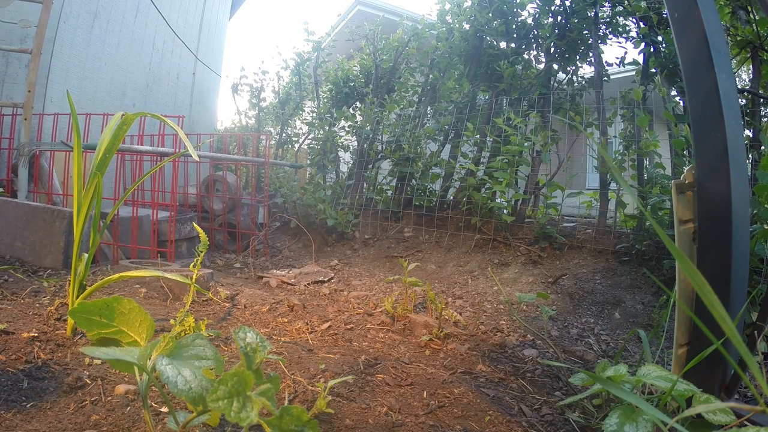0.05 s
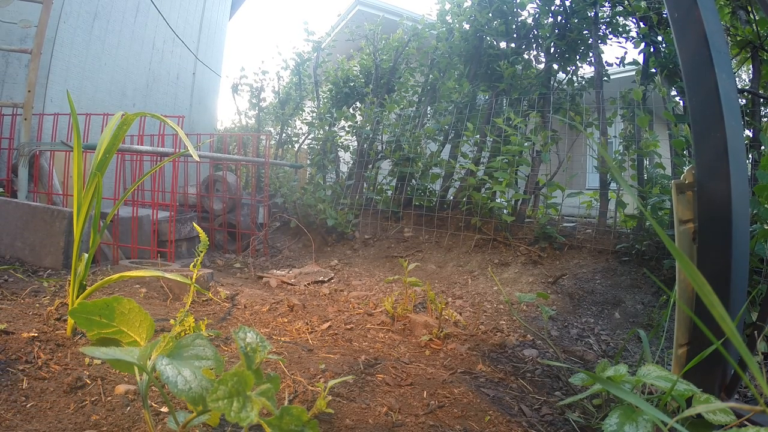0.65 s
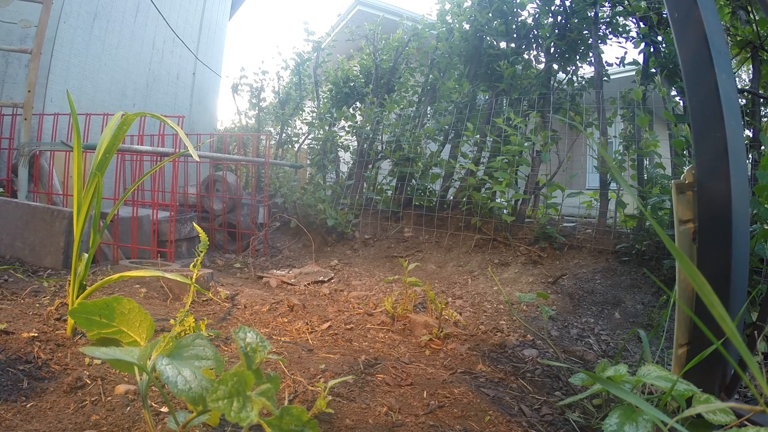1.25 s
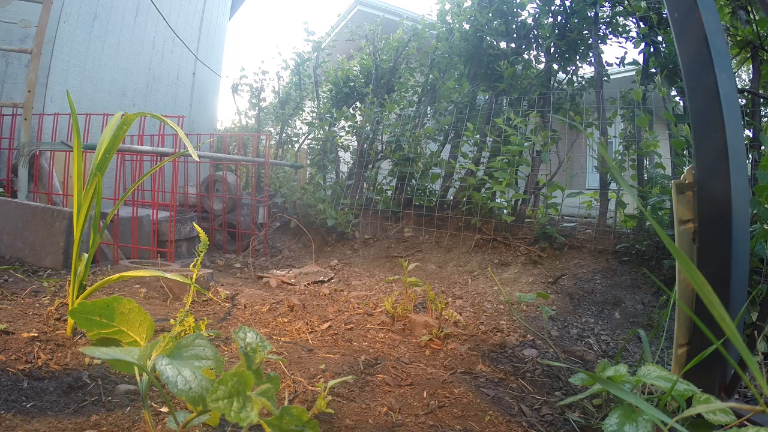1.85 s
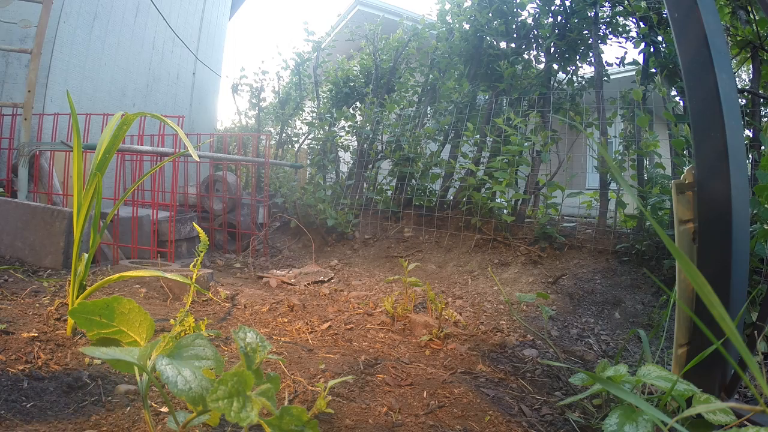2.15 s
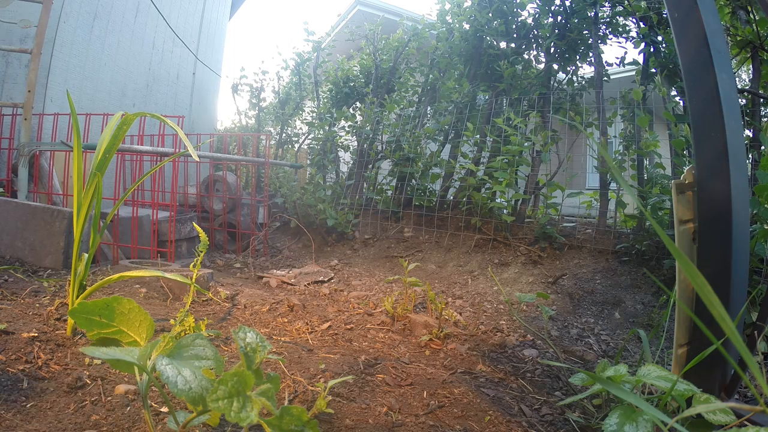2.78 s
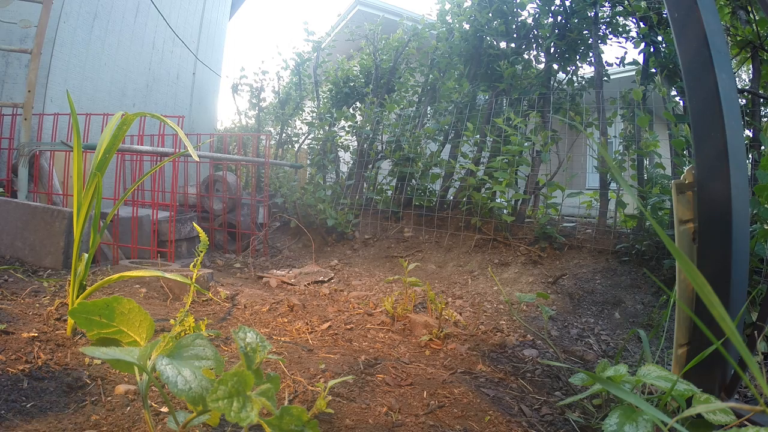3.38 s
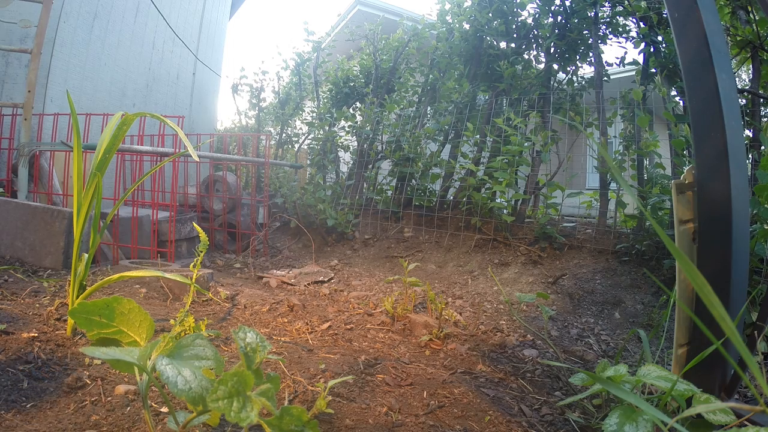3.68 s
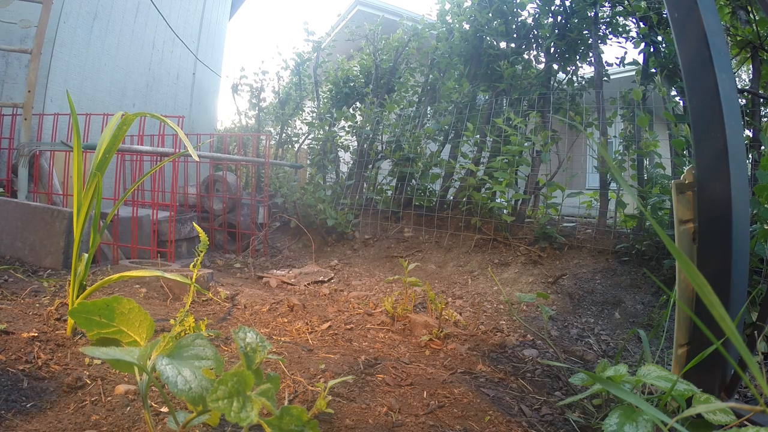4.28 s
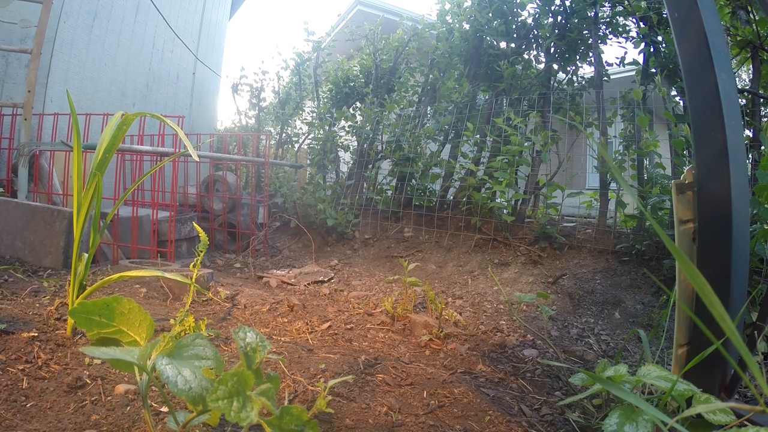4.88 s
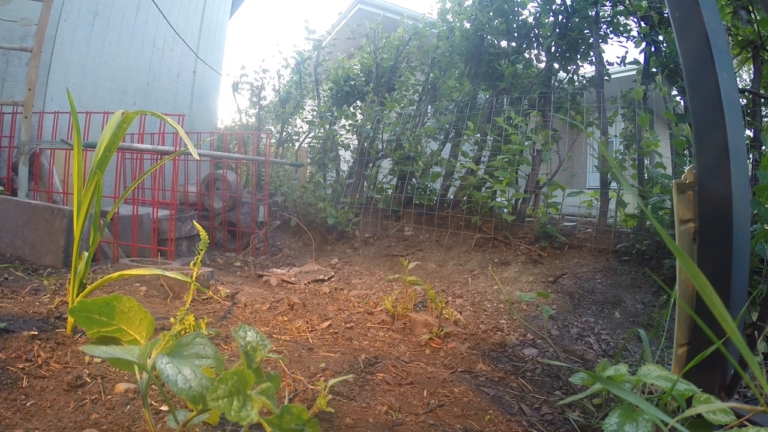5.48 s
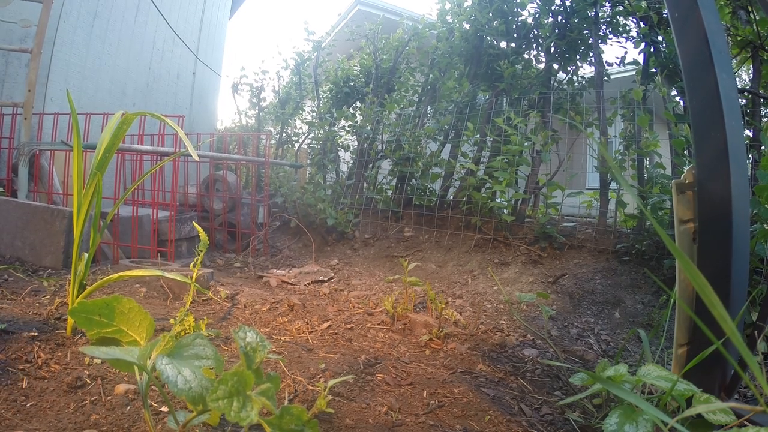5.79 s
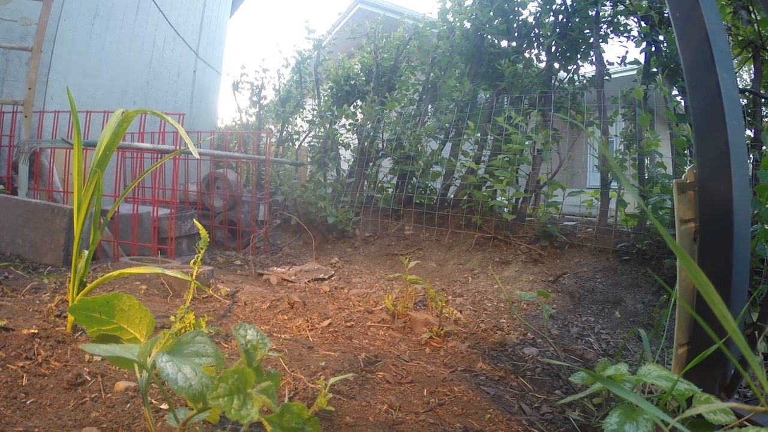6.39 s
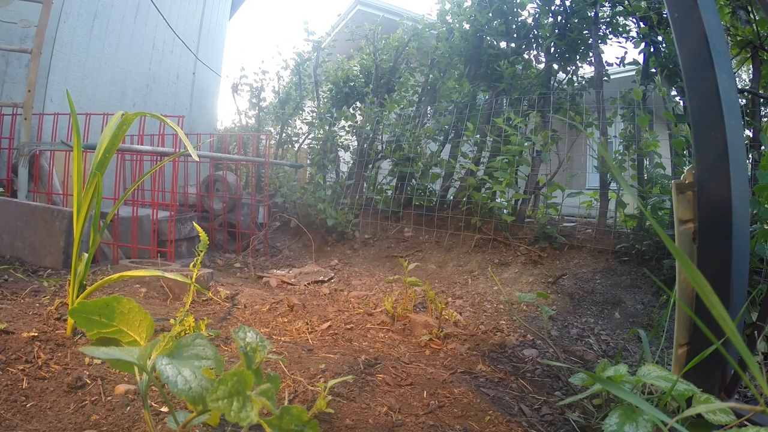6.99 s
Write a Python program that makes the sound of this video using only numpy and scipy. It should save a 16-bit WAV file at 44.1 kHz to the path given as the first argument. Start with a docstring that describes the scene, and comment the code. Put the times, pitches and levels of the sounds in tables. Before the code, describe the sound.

Small animals paw at a camera in garden mulch, heard very close through its own microphone, over a steady low town hush and a very faint high electronic whine. For the first 1.5 seconds fur brushes softly across the hollow case and a paw pads. Dry wood chips snap at about 1.5 seconds, with dull steps at 1.6 and 2.8. A bird gives thin, faint chips at 1.8 and 2.5 seconds. A flicked stem pings sharply at 3.1. Rubbing resumes at 3.6 seconds with a low, wobbling rumble and slight mulch crackle. From 4.5 seconds claws and noses knock the case, each blow ringing hollow and thumping the mount. The loudest knocks and scrapes come in a quick cluster from 5.3 to 5.7 seconds and again around 6.4 to 6.6. A last light stroke fades at 7 seconds.

```python
"""Small animals paw at a camera standing in garden mulch, over town hush and a faint electronic whine.
First, fur brushes the hollow case and a paw pads; wood chips snap at 1.5 s.
A bird chips at 1.8 and 2.5 s; a flicked stem pings at 3.1 s. Rubbing resumes at 3.6 s.
From 4.5 s, claws and noses knock the case: each blow rings it, thumps the mount and sets it swaying.
The hardest blows fall at 5.3-6.6 s; a last light stroke ends at 7 s."""
import sys
import numpy as np
from scipy import signal
from scipy.fft import rfft, irfft
from scipy.io import wavfile

SR = 44100
rng = np.random.default_rng(int(sys.argv[2]) if len(sys.argv) > 2 else 0)


def unload_wav(signal):
    """Save mono or channel-first audio to the path in sys.argv[1] as 16-bit WAV at rate SR, clipped to [-1, 1]."""
    wavfile.write(
        sys.argv[1],
        SR,
        np.round(np.clip(np.atleast_2d(signal).T, -1, 1) * 32767).astype(np.int16),
    )


N = 310442

# claw or nose blows: (time [s], case level [dB], brightness [dB], top [dB], pitch [Hz], mount level [dB])
BLOWS = [(4.54, -48, -16, -8, 1000, -42.5), (4.578, -46.5, -2, 6, 1190, -46),
         (4.797, -53.5, 0, 3, 1190, -47), (5.302, -28, 10, 19, 1050, -22.5),
         (5.452, -25.5, -4.5, 4.5, 840, -38), (5.483, -29.5, 4.5, 10, 900, -39),
         (5.513, -32.5, 6, -3, 840, -37), (5.533, -41.5, 6, 5, 2580, -47),
         (5.544, -37, 12.5, 9, 3980, -36.5), (5.656, -42, 6.5, 6, 820, -35), (6.4336, -23, 3, 1, 537, -24),
         (6.566, -28.5, 5.5, 8, 1730, -20.5), (6.58, -26, 5.5, 7, 1420, -39)]
# paw and fur strokes: (start [s], end [s], level [dB], brightness [dB])
STROKES = [(0.036, 0.124, -58, 2.5), (.17, .25, -63, 2), (0.439, .52, -65.5, 3), (0.729, 0.868, -58.5, 2),
           (0.901, 0.954, -55, 5.5), (1.201, 1.291, -59.5, -4), (1.31, 1.44, -59, 1),
           (3.598, 3.665, -57, 9.5), (3.847, 3.884, -54, 5), (3.98, 4.049, -48.5, 5),
           (4.032, 4.107, -43, 8), (4.153, 4.185, -58.5, 8), (4.571, 4.637, -60.5, -2),
           (4.691, 4.72, -59, 0), (4.787, 4.832, -53, 0.5), (4.959, 5.025, -56.5, 2),
           (5.319, 5.596, -37.5, 1), (5.354, 5.41, -36.5, -2.5), (5.573, 5.655, -49, 2.5),
           (5.729, 6.105, -64.5, 0), (6.473, 6.506, -32.5, -3), (6.503, 6.563, -38.5, -1),
           (6.64, 6.707, -55, -2), (6.786, 7.016, -66.5, -3)]
# case pitch favoured by a stroke: (stroke level [dB], pitch [Hz])
STROKE_PITCH = [(-44, 1440), (-37.5, 1580), (-32.5, 900)]
# case resonances: (frequency [Hz], width [Hz], gain [dB])
CASE_MODES = [(561, 110, -13.5), (771, 34, 3.5), (837.6, 56, 2.5), (936, 58, -6.5), (1223, 93, -4),
              (1494, 180, -10), (1595, 81, -1.5), (1992, 113, -11), (2338, 146, -8), (2913, 130, -19),
              (3240, 270, -15.5), (4010, 280, -22), (4760, 240, -22.5), (5460, 110, -24),
              (6760, 600, -35.5), (7670, 130, -33.5), (8120, 280, -38), (9600, 470, -40), (10600, 410, -36)]
# case response between resonances: (frequency [Hz], gain [dB])
CASE_FLOOR = [(60, -38), (350, -64), (700, -12.5), (2200, -27.5), (5400, -31), (6200, -43.5),
              (11000, -57.5), (15000, -64)]
# mount resonances: (frequency [Hz], width [Hz], gain [dB])
MOUNT_MODES = [(47, 24, -13), (117.7, 25, 3), (163, 18, -9.5), (202.5, 23.4, 0), (228.8, 13, -7.5)]
# animal leaning on the camera: (time [s], hold [s], sway level [dB], mount level [dB])
LEANS = [(0.049, 0.17, -57, -68), (.83, .06, -49.5, -66), (3.619, .26, -40, -52), (4.14, 0.075, -39.5, -48),
         (4.6, 0.26, -46, -54.5), (4.979, .05, -43, -58), (5.66, 0.05, -46.5, -46), (5.77, .08, -44, -60),
         (6.43, .26, -43, -41.5)]
# stem resonances: (frequency [Hz], gain [dB], T60 [s])
STEM_MODES = [(784, -6.5, 0.08), (1440, -30, 0.045), (1590, -9, 0.054), (2350, 0.5, 0.031),
              (2630, -1, 0.012), (2900, -14, 0.089), (2900, -16.5, 0.093), (3063, -5, 0.022),
              (3460, -13, 0.013), (4140, -3.5, .016), (4620, -10, .018)]
# flick spectrum: (frequency [Hz], gain [dB])
FLICK_SPECTRUM = [(300, -15), (1100, -1), (1900, -3), (2600, 2.5), (3600, -7), (4800, -3), (6000, -14.5),
                  (10500, -23), (13000, -48)]
# chips breaking: (time [s], level [dB])
CHIP_SNAPS = [(1.478, -55.5), (1.5003, -50.5), (1.504, -52), (1.5335, -58), (1.5872, -64), (1.6147, -43)]
# crack spectrum: (frequency [Hz], gain [dB])
CRACK_SPECTRUM = [(300, 14), (1500, 0), (2900, 0), (4200, 5.5), (8000, -3), (12000, 2.5), (16000, -4)]
# chip resonances: (frequency [Hz], width [Hz], gain [dB])
CHIP_MODES = [(1240, 76, 4), (3950, 130, -5), (4200, 120, -8), (4700, 110, -4)]
# paws on soft ground: (time [s], decay [s], pitch [Hz], level [dB])
STEPS = [(.93, 0.018, 214, -49.5), (1.618, 0.012, 234, -44), (2.797, 0.058, 227, -47),
         (4.54, 0.008, 233, -49)]
# mulch crackle spectrum: (frequency [Hz], gain [dB])
RUSTLE_SPECTRUM = [(1000, -9), (3500, 2), (6000, -0.5), (10000, -2), (13000, -15), (16000, -1)]
# bird calls: (time [s], pitch [Hz], level [dB])
BIRD_CALLS = [(1.838, 6460, -73), (2.549, 6560, -69.5)]
# town noise and hiss: (frequency [Hz], relative density [dB])
HUSH_SPECTRUM = [(12, -22), (20, 2), (194, -3), (286, -6.5), (398, -9), (818, -13), (1050, -15),
                 (1240, -16.5), (1780, -18), (5850, -28), (6720, -29.5), (12000, -37.5), (13400, -39.5),
                 (15000, -45.5)]
# camera electronics: (frequency [Hz], level [dB])
WHINE_TONES = [(4737, -81.5), (9421, -91), (14158, -82)]

LEAN_RISE_S = 0.013
FFT_SIZE = 8192
BINS_HZ = np.fft.rfftfreq(FFT_SIZE, 1 / SR)


def knocks(skid_s=0.0054, slide_s=0.013, slide_db=-17, mount_lag_s=0.003):
    """A claw lands, skids and slides off the case; the heavier mount follows."""
    out, mount = np.zeros(N), modal_ring(MOUNT_MODES, skirt=1.7)
    t = np.arange(SR // 12) / SR
    for time_s, db, bright_db, top_db, pitch_hz, mount_db in BLOWS:
        blow = signal.fftconvolve(skid(skid_s), case_ring(bright_db, top_db - 2, pitch_hz))
        add(blow, 0, 0.15 * case_ring(bright_db, top_db + 6, pitch_hz))  # first touch is brightest
        friction = rng.standard_normal(len(t)) * np.exp(-t / slide_s)
        slide = signal.fftconvolve(friction, case_ring(bright_db, top_db=-3, pitch_hz=2900))
        add(out, time_s, with_energy(blow, db, 0.015))
        add(out, time_s + skid_s, with_energy(slide, db + slide_db, 0.017))
        add(out, time_s + mount_lag_s, with_energy(mount, mount_db, 0.018))
    return out


def scrapes(mount_db=-5):
    """Paw and fur drag over the case with wavering pressure and shake the mount."""
    out, mount = np.zeros(N), modal_ring(MOUNT_MODES, skirt=1.7)
    pressure = amplitude(1.44 * wander(N, hz=70.4))
    for start_s, end_s, db, bright_db in STROKES:
        length_s = end_s - start_s
        size = round(length_s * SR)
        force = signal.windows.tukey(size, 0.29) * pressure[round(start_s * SR):][:size]
        drive = force * stick_slip(size, slips_per_s=1500, spread_db=4, rub_rms=0.85)
        body_db = np.interp(db, [-58, -45], [-2, 0])  # light touch: weaker low modes
        pitch_hz = np.interp(db, *np.transpose(STROKE_PITCH))
        case = case_ring(bright_db, bright_db - 1, pitch_hz, body_db)
        add(out, start_s, with_energy(signal.fftconvolve(drive, case), db, length_s))
        add(out, start_s, with_energy(signal.fftconvolve(drive, mount), db + mount_db, length_s))
    return out


def case_ring(bright_db, top_db, pitch_hz, body_db=0, focus_db=5, focus_octaves=0.25):
    """Hollow case: harder contact reaches higher modes; those near the contact pitch are favoured."""
    tilt = [(900, body_db), (1500, 0), (2900, bright_db), (5200, bright_db), (8000, top_db)]
    octaves = np.log2((BINS_HZ + 1) / pitch_hz)
    focus = amplitude(focus_db * np.exp(-(octaves / focus_octaves) ** 2))
    power = modal_power(CASE_MODES, skirt=1.62) + curve_gain(CASE_FLOOR) ** 2
    return impulse_response(np.sqrt(power) * curve_gain(tilt) * focus)


def stick_slip(size, slips_per_s, spread_db, rub_rms):
    """Friction: uneven clicks at rms 1 over smooth rubbing noise."""
    strengths = amplitude(spread_db * np.minimum(rng.exponential(1, size), 4))
    clicks = strengths * rng.choice([-1, 1], size) * (rng.random(size) < slips_per_s / SR)
    return unit_rms(clicks) + rub_rms * rng.standard_normal(size)


def skid(contact_s):
    """Brief contact chatter, whitened, energy 1."""
    t = np.arange(SR // 16) / SR
    fade = np.exp(-(t / contact_s) ** 2)
    spectrum = rfft(stick_slip(len(t), slips_per_s=3200, spread_db=1.5, rub_rms=0.58) * fade)
    chatter = irfft(spectrum / (abs(spectrum) + 1e-12), len(t)) * fade ** 0.25
    return chatter / np.linalg.norm(chatter)


def sway(rock_hz=22.7, twist_hz=44, twist_db=-6, jolt_db=-14, jolt_s=0.022, rest_db=-71.5):
    """Leans and blows rock and twist the camera on its mount; it settles to a faint tremble."""
    power = sum((amplitude(db) * push(time_s, hold_s, LEAN_RISE_S, decay_s=0.11)) ** 2
                for time_s, hold_s, db, _ in LEANS)
    power += sum((amplitude(db + jolt_db) * push(time_s, jolt_s, jolt_s / 2, jolt_s)) ** 2
                 for time_s, *_, db in BLOWS)
    envelope = np.sqrt(power + amplitude(rest_db) ** 2)
    rock = np.sin(phase_rad(rock_hz * (1 + 0.1315 * wander(N, hz=14.97))))
    twist = np.sin(phase_rad(twist_hz * (1 + 0.1315 * wander(N, hz=14.97))))
    twist *= amplitude(twist_db) * (1 + 0.5 * wander(N, hz=17))
    return envelope * unit_rms(rock + twist)


def shudder(release_s=0.035, cutoff_hz=170):
    """The mount rumbles in its lower modes while an animal leans on it."""
    envelope = sum(amplitude(db) * push(time_s, hold_s, LEAN_RISE_S, release_s)
                   for time_s, hold_s, _, db in LEANS)
    power = modal_power(MOUNT_MODES, skirt=1.45) / (1 + (BINS_HZ / cutoff_hz) ** 2)
    rumble = signal.oaconvolve(rng.standard_normal(N), impulse_response(np.sqrt(power)))[:N]
    return envelope * unit_rms(rumble)


def stem_ping(time_s=3.0625, level_db=-33, rise_s=0.00048, click_db=-11, click_s=0.0049):
    """A thin hard stem is flicked: dry click, short modal ring."""
    out, t = np.zeros(N), np.arange(SR // 5) / SR
    ring = sum(amplitude(db - 60 * t / t60_s) * np.sin(2 * np.pi * (hz * t + rng.random()))
               for hz, db, t60_s in STEM_MODES)
    ring *= 1 - np.exp(-t / rise_s)
    click = signal.fftconvolve(skid(click_s), impulse_response(curve_gain(FLICK_SPECTRUM)))
    add(out, time_s, with_energy(ring, level_db, 0.011))
    add(out, time_s, with_energy(click, level_db + click_db, 0.021))
    return out


def chip_snaps(crack_s=0.00039, tail_s=0.0057, tail_db=-19, ring_db=-11):
    """Dry chips break: bright tick, tiny woody ring."""
    out, t = np.zeros(N), np.arange(SR // 40) / SR
    colour = impulse_response(curve_gain(CRACK_SPECTRUM))
    wood = modal_ring(CHIP_MODES, skirt=1.8)
    envelope = np.exp(-t / crack_s) + amplitude(tail_db) * np.exp(-t / tail_s)
    for time_s, db in CHIP_SNAPS:
        crack = rng.standard_normal(len(t)) * envelope
        add(out, time_s, with_energy(signal.fftconvolve(crack, colour), db, 0.0037))
        add(out, time_s, with_energy(wood, db + ring_db, 0.0064))
    return out


def paw_steps(width_hz=110):
    """A soft paw presses the mulch: dull puff."""
    out, t = np.zeros(N), np.arange(SR // 4) / SR
    for time_s, decay_s, pitch_hz, db in STEPS:
        press = rng.standard_normal(len(t)) * np.exp(-t / decay_s)
        ground = modal_ring([(pitch_hz, width_hz, 0)], skirt=1.65)
        add(out, time_s, with_energy(signal.fftconvolve(press, ground), db, 0.02))
    return out


def rustles(step_db=-72, step_s=0.079, delay_s=0.03, stray_db=-74, stray_s=0.055, strays=10):
    """Chips and leaves shift and crackle at each lean and step, and at random times."""
    out, colour = np.zeros(N), impulse_response(curve_gain(RUSTLE_SPECTRUM))
    stray_times_s = (np.arange(strays) + rng.random(strays)) * N / SR / strays
    clumps = [(time_s + delay_s, step_s, step_db) for time_s, *_ in LEANS + STEPS]
    clumps += [(time_s, stray_s, stray_db) for time_s in stray_times_s]
    for centre_s, length_s, db in clumps:
        size = round(length_s * SR)
        crackle = stick_slip(size, slips_per_s=4100, spread_db=10, rub_rms=0.74)
        crackle *= signal.windows.tukey(size, 0.8)
        add(out, centre_s - length_s / 2, with_energy(signal.fftconvolve(crackle, colour), db, length_s))
    return out


def bird(length_s=0.079, drop_s=0.0059, octave_db=-6):
    """Thin high chips: pitch drops, holds, lifts at the end."""
    out, t = np.zeros(N), np.arange(round(length_s * SR)) / SR
    bend = 1 + 0.069 * np.exp(-t / drop_s) + 0.02 * (t / length_s) ** 6
    for time_s, pitch_hz, db in BIRD_CALLS:
        phase = phase_rad(pitch_hz * (bend + 0.005 * wander(len(t), hz=150)))
        tone = np.sin(phase) + amplitude(octave_db) * np.sin(2 * phase)
        add(out, time_s, amplitude(db) * unit_rms(tone) * signal.windows.tukey(len(t), 0.12))
    return out


def hush(level_db=-56, drift_db=0.24):
    """Far town noise and microphone hiss, drifting slightly."""
    colour = curve_gain(HUSH_SPECTRUM, np.fft.rfftfreq(N, 1 / SR))
    noise = unit_rms(irfft(rfft(rng.standard_normal(N)) * colour, N))
    return noise * amplitude(level_db + drift_db * wander(N, hz=0.93))


def whine(pulse_hz=29.97, jitter_rad=1.7):
    """Camera electronics: faint fuzzy tones pulsing at the frame rate."""
    out, t = np.zeros(N), np.arange(N) / SR
    pulse = 1 + np.sin(2 * np.pi * pulse_hz * t)
    for hz, db in WHINE_TONES:
        tone = np.sin(2 * np.pi * hz * t + jitter_rad * wander(N, hz=130))
        out += amplitude(db) * unit_rms(pulse * tone)
    return out


def push(start_s, hold_s, rise_s, decay_s):
    """Push envelope: linear rise, hold, exponential decay."""
    t = np.arange(N) / SR - start_s
    return np.clip(t / rise_s, 0, 1) * np.exp(-np.clip((t - hold_s) / decay_s, 0, 20))


def wander(size, hz):
    """Smooth noise, rms about 1, rolling off at hz."""
    lowpass = np.exp(-(np.fft.rfftfreq(N, 1 / SR) / hz) ** 2)
    return unit_rms(irfft(rfft(rng.standard_normal(N)) * lowpass, N))[:size]


def modal_power(modes, skirt):
    """Power response of resonances; higher skirt, deeper valleys."""
    return sum(amplitude(db) ** 2 / (1 + (2 * (BINS_HZ - hz) / width_hz) ** 2) ** skirt
               for hz, width_hz, db in modes)


def modal_ring(modes, skirt):
    """Impulse response of resonances."""
    return impulse_response(np.sqrt(modal_power(modes, skirt)))


def impulse_response(gain):
    """Minimum-phase response of a gain curve scaled to peak 1."""
    log_gain = np.log(np.maximum(gain / gain.max(), 1e-5))
    mirrored = np.concatenate([log_gain, log_gain[-2:0:-1]])
    spectrum = np.exp(np.conj(signal.hilbert(mirrored)))
    return np.fft.ifft(spectrum).real[:FFT_SIZE * 3 // 4]


def curve_gain(points, hz=BINS_HZ):
    """Amplitude from (frequency [Hz], gain [dB]) points, log-frequency axis."""
    points_hz, points_db = np.transpose(points)
    return amplitude(np.interp(np.log(hz + 1), np.log(points_hz + 1), points_db))


def with_energy(x, db, length_s):
    """Scale x to the energy of a sound of this level and length."""
    return amplitude(db) * x * np.sqrt(length_s * SR / (np.sum(x ** 2) + 1e-20))


def unit_rms(x):
    return x / np.sqrt(np.mean(x ** 2) + 1e-20)


def amplitude(db):
    return 10 ** (np.asarray(db) / 20)


def phase_rad(hz):
    return 2 * np.pi * np.cumsum(hz) / SR


def add(mix, time_s, sound):
    part = mix[max(round(time_s * SR), 0):][:len(sound)]
    part += sound[:len(part)]


def scene():
    """Mono sum at the microphone."""
    camera = scrapes() + knocks() + sway() + shudder()
    garden = stem_ping() + paw_steps() + chip_snaps() + rustles() + bird()
    return (camera + garden + hush() + whine())[None]


def record(dry):
    """Low-pass at 16 kHz."""
    lowpass = signal.firwin(255, 16000, window=("kaiser", 9), fs=SR)
    return signal.oaconvolve(dry, lowpass[None], "same")


dry = scene()
out = record(dry)
unload_wav(out)
```